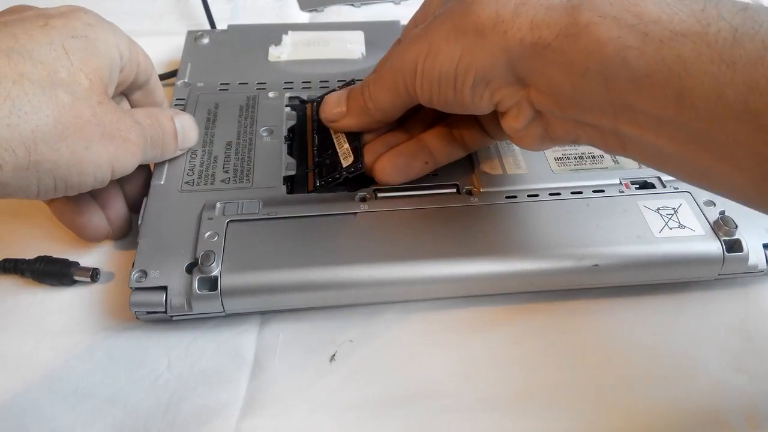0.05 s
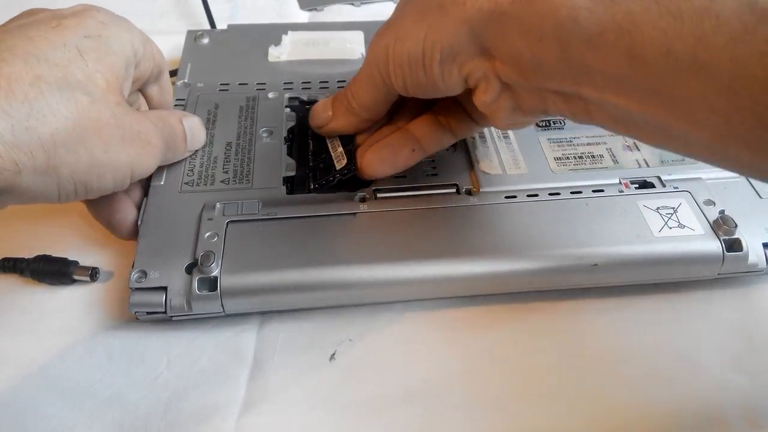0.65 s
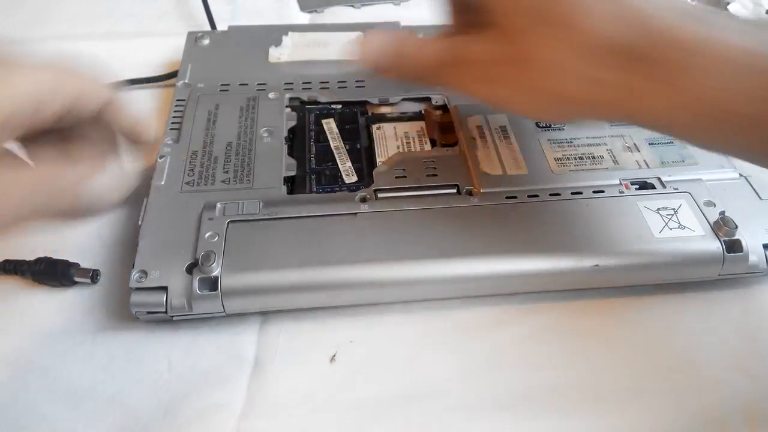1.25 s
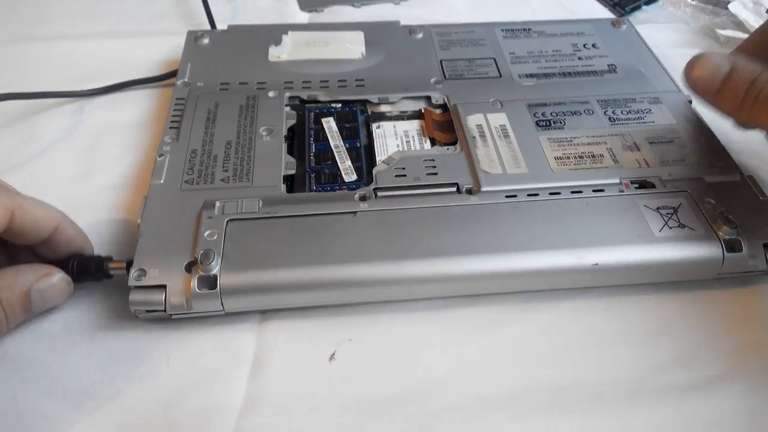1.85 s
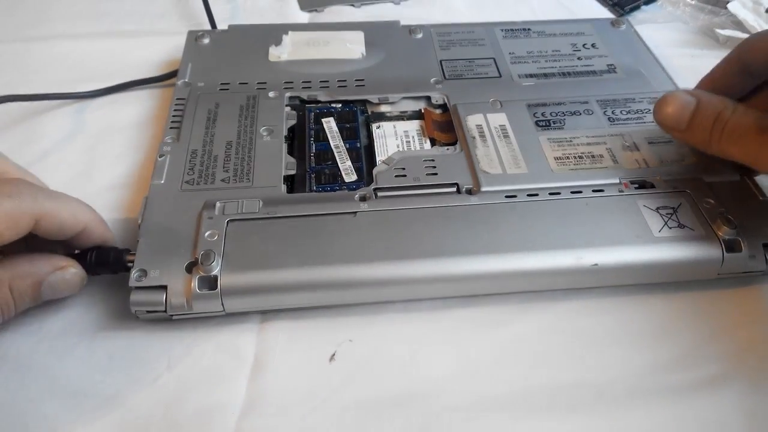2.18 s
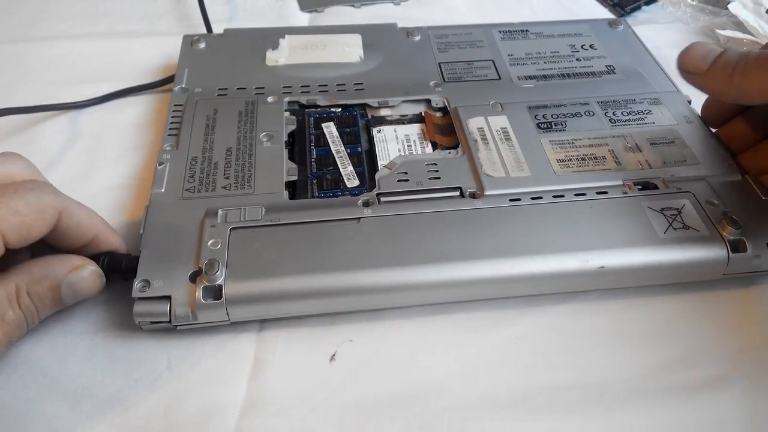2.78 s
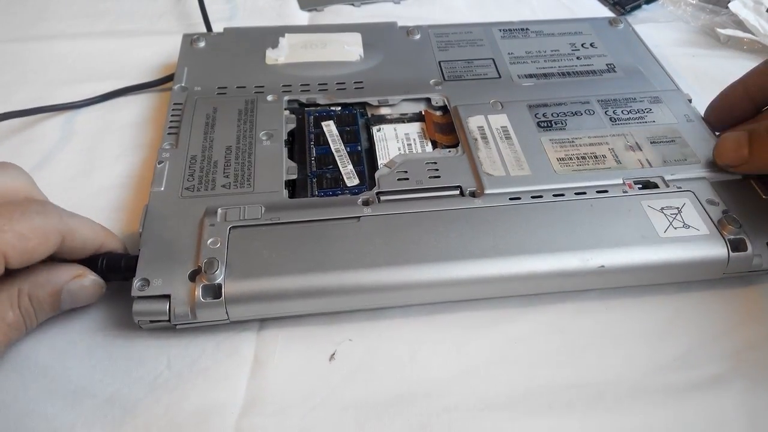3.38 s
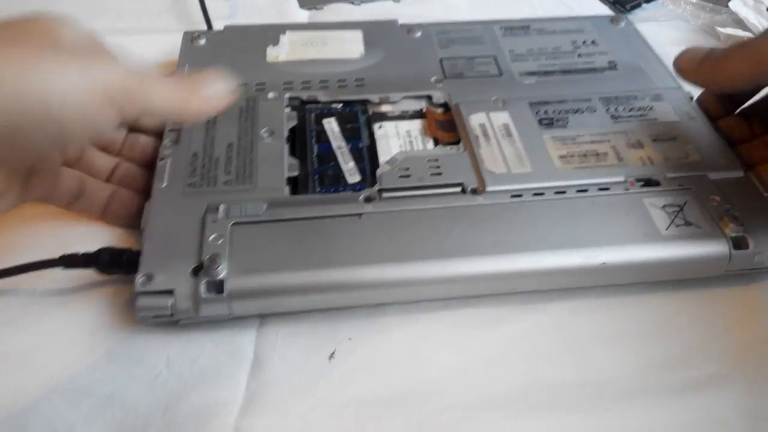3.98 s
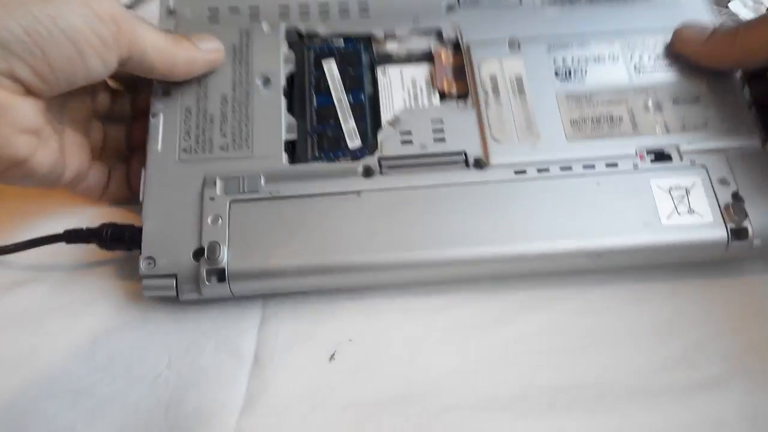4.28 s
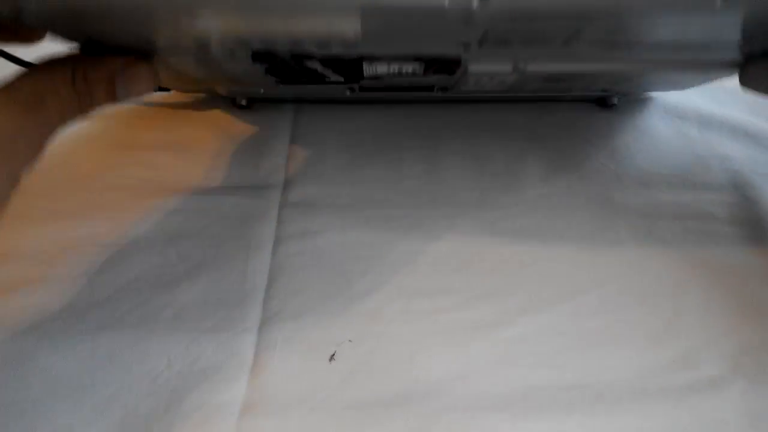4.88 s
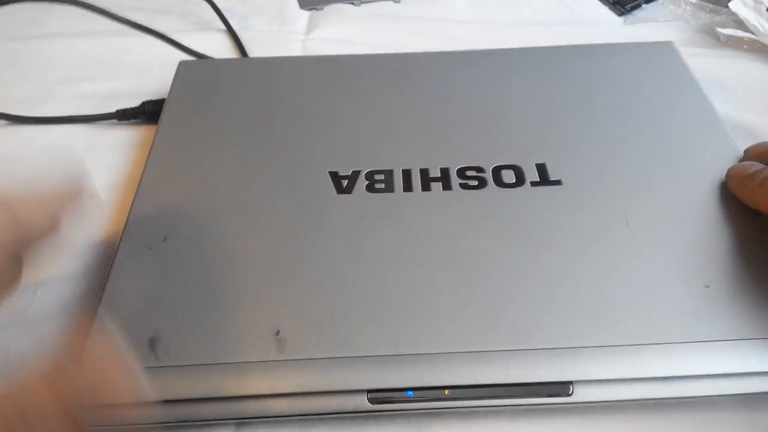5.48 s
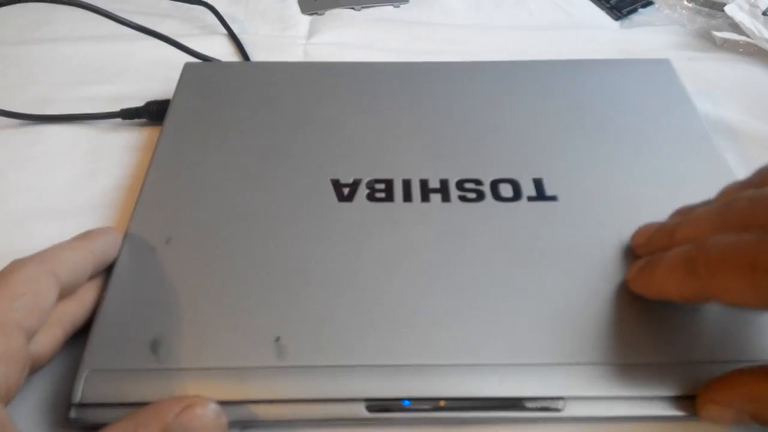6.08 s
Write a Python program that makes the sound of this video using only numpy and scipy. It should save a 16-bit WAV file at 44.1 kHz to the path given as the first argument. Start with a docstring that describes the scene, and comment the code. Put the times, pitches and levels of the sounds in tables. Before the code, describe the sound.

Close to the microphone in a small room, a plastic click and a crisp metallic snap sound as a memory module locks into a laptop. After a soft thump, a power plug clicks into place. Hands then lift and flip the laptop with quiet rubbing and sharp plastic cracks, and it lands with a thud on a covered table. A few clicks, knocks and a short finger rub follow. Faint hum and hiss lie underneath.

```python
"""A memory module clicks into a laptop until its steel latches snap; then the power plug goes in.
Plastic contacts ring the case and rebound; released springs ring far into the treble.
The laptop is gripped, creaks as it is turned over, thuds on a cloth-covered table and settles.
Fingers stick and slip on the lid. Heard close up in a small room, over faint rumble, hiss and hum."""
import sys
import numpy as np
from scipy import signal
from scipy.fft import rfft, irfft, next_fast_len
from scipy.io import wavfile

SR = 44100
rng = np.random.default_rng(int(sys.argv[2]) if len(sys.argv) > 2 else 0)


def wav_out(sig):
    """Save sig, one row per channel (or a flat mono array), as 16-bit PCM at SR to the path in sys.argv[1]."""
    wavfile.write(sys.argv[1], SR, np.round(np.clip(np.atleast_2d(sig).T, -1, 1) * 32767).astype(np.int16))


N = 275272
TIME_S = np.arange(N) / SR
RING_S = np.arange(SR // 7) / SR

# Plastic contacts. Each row: start in seconds, level in dB, ring pitch in Hz, hollow low end in dB,
# relative after-ring in dB, rightward lean from 0 to 1, settling time in seconds.
PLASTIC_CLICKS = [(0.0746, -51, 1660, 20, 3, 1, .002), (.962, -54, 2850, 26, 19, 0.6, .008),
                  (1.066, -23, 2420, 8, -5.5, 0.62, 0.0057), (1.115, -47, 2270, 21, 12, .5, 0.0019),
                  (1.5725, -55, 3770, -2.5, -5, .1, 0.0021), (2.233, -38.5, 3600, 2, -21, 0.8, 0.00071),
                  (2.689, -50, 2350, -19, 5, .5, 0.003), (2.7586, -24.5, 3650, -3, -11.5, 0.64, .0015),
                  (2.762, -32.5, 1130, 5.5, -2, .5, 0.0026), (4.123, -46.5, 2980, 25.5, -24, 0.3, 0.013),
                  (4.1997, -42.5, 3080, 19, 4, 0.6, .03), (4.236, -32.5, 2070, 9, -5, 0.45, 0.0023),
                  (4.361, -33, 2180, 8.5, -16.5, 0.2, 0.0028), (4.3768, -9, 3060, -4.5, -5.5, 0.6, .0014),
                  (4.4959, -14.5, 3250, 13, 1, 0.4, 0.0022), (4.661, -37, 2220, 8, -28, .3, 0.0021),
                  (4.803, -38, 3540, 8.5, 0.5, .3, .012), (4.9814, -20, 3150, 23, 13, .5, .012),
                  (5.1682, -42.5, 2100, -12, -1, 0.34, .002), (5.3557, -32, 3030, 23.5, 3, 0.53, 0.0044),
                  (5.378, -41, 970, 32, 25.5, 0.03, .003), (5.4992, -13.5, 3580, 4.5, -6.5, 0.6, 0.00084),
                  (5.574, -33, 1930, 24.5, 2, .1, 0.0026), (5.7019, -49, 3500, 8, -15, 0, .002),
                  (5.8416, -22, 3300, 20.5, 7, .1, .006)]
# Sprung steel. Each row: start in seconds, level in dB.
STEEL_SNAPS = [(1.132, -31), (1.1369, -12), (1.1359, -13), (1.203, -43), (1.777, -51), (4.8962, -48.5)]
# Blows on chassis and table. Each row: start in seconds, relative force in dB, contact softness in ms,
# ring time factor.
BLOWS = [(0.964, -20.5, 3.3, 1.7), (1.066, -14, 2.04, 1.4), (1.136, -14, 1.18, 0.89),
         (1.564, -19, 2.06, 0.9), (1.86, 1, 8.7, 0.66), (4.01, -18, 2.3, 1.9), (4.208, -19.5, 2.6, 2.9),
         (4.9742, -0.5, 0.62, 1.1), (4.9791, 5, 0.23, 1.09), (5.003, -5, 1.7, 0.46),
         (5.377, -22, 0.52, 1.9), (5.555, -11, 1.43, 1.1), (5.826, -12.5, 1.84, 0.71),
         (5.844, -8, 0.8, 1.65), (6.155, -22.5, 2, 1.9), (6.213, -7.5, 2.55, 1.3)]
# Hands shifting on the case. Each row: start in seconds, hold in seconds, rubbing in dB, sway in dB.
HAND_STROKES = [(0.938, 0.055, -72, -59.5), (1.694, 0.63, -96, -71), (4.085, 0.51, -66, -54),
                (5.16, 0.033, -58, -61), (5.55, 0.12, -61.5, -48.5)]
# Envelope of fingertips on the lid. Each row: time in seconds, level in dB.
LID_DRAG = [(6.09, -88), (6.12, -45.5), (6.16, -37.5), (6.18, -38.5), (6.24, -37)]

# Case and latch resonances. Each row: frequency in Hz, relative level in dB, t60 in seconds.
CASE_RESONANCES = [(513, 4, 0.087), (960, -2, .18), (1130, 0.5, 0.17), (1633, 3.5, 0.12),
                   (1960, -14, 0.033), (2210, -11.5, 0.018), (2300, 10, 0.063), (2860, -64.5, 0.031),
                   (2940, -10.5, 0.081), (3340, -8.5, 0.057), (3950, 6, 0.045), (4400, -22, 0.051),
                   (5200, -4.5, .05)]
LATCH_RESONANCES = [(2640, 24, 0.1), (3500, -8.5, .09), (5200, -22, .045), (5200, -27, 0.1),
                    (6170, -8, .04), (9400, 11.5, 0.021), (11450, -7, 0.059), (11100, -6, .05),
                    (14100, 5, .05), (15200, -1, .04)]
# Table resonances. Each row: frequency in Hz, relative level in dB, t60 in seconds before damping.
TABLE_RESONANCES = [(50.6, -14, 0.067), (98.3, -38.5, 0.39), (123, -15, 0.62), (149, -14, .14),
                    (185.3, -9.5, 0.18), (229.2, -11, .2), (263, -2, 0.026), (254, -16, 0.15),
                    (322, -13.5, 0.42), (361, -14, 0.2), (413, -29, 0.053), (483, -45, 0.11),
                    (553, -29.5, 0.47), (633, -41, 0.35)]

# Spectra of case, latch, skin rub, lid rub and room noise. Each row: frequency in Hz, gain in dB.
CASE_SPECTRUM = [(120, -31), (400, -7), (750, -13), (1400, -6.5), (2000, 2.5), (3300, 0.5), (4500, 1),
                 (6000, -9.5), (7800, -23), (10000, -12.5), (12000, -13), (15500, -19)]
LATCH_SPECTRUM = [(150, -66.5), (500, -5), (750, -12.5), (1500, -10.5), (2800, -4), (4700, -2.5),
                  (6300, -8), (7800, -22.5), (9700, -4.5), (12000, -9), (15500, -2.5)]
SKIN_SPECTRUM = [(40, -32.5), (130, 3), (300, -17.5), (700, -7.5), (1300, -4), (2100, -3.5), (3600, -0.5),
                 (5000, -6.5), (7500, -22), (11500, -10.5), (15500, -14.5)]
LID_SPECTRUM = [(40, -19), (120, 20.5), (230, -4), (350, 2), (900, -5), (1550, 1), (2400, -5), (2900, -2),
                (3400, 9), (4000, -5), (5000, -15.5), (7500, -32.5), (12000, -25.5), (15500, -26)]
AIR_SPECTRUM = [(25, -14.5), (45, -10), (70, -0.5), (110, 2), (200, -9), (370, -12), (630, -20.5),
                (1300, -26.5), (2400, -25), (4400, -24), (7600, -32.5), (9500, -31.5), (11500, -24.5),
                (15500, -27.5)]
# Spectra of chassis sway and loose parts. Each row: frequency in Hz, gain in dB.
SWAY_SPECTRUM = [(30, -32.5), (60, -2.5), (135, -7), (300, -16), (700, -31), (2000, -65)]
RATTLE_SPECTRUM = [(30, -44), (55, -11.5), (130, -11), (350, -4), (600, -8.5), (1500, -42)]
# Stereo width of handling and room noise. Each row: frequency in Hz, side gain in dB.
HANDLING_SIDE = [(60, -19.5), (250, -21.5), (500, -11.5), (1200, -7.5), (2300, -8.5), (4000, -1),
                 (7000, 4.5), (15000, 4.5)]
AIR_SIDE = [(60, -12), (200, -9.5), (700, -4.5), (2400, -3), (4400, 2.5), (8000, 7), (15000, 5)]


def undb(db):
    """Decibels to gain."""
    return 10 ** (np.asarray(db) / 20)


def unit(x):
    """Scale to rms 1."""
    return x / np.sqrt(np.mean(x ** 2))


def fade(t_s, t60_s):
    """Exponential decay, 60 dB down at t60_s."""
    return np.exp(-np.log(1000) * t_s / t60_s)


def add(track, start_s, sound):
    """Mix a sound into a track."""
    i = int(start_s * SR)
    track[..., i:i + sound.shape[-1]] += sound[..., :N - i]


def curve(points):
    """(Hz, dB) points as a function of frequency."""
    hz, db = np.transpose(points)
    return lambda f_hz: np.interp(np.log(f_hz + 1), np.log(hz), db)


def colour(x, db_at, causal=True):
    """Filter by a dB curve; minimum phase when causal, else zero phase."""
    size = 2 * next_fast_len(x.shape[-1] // 2 + 2048)
    gain = undb(db_at(np.arange(size // 2 + 1) * SR / size))
    if causal:
        cepstrum = irfft(np.log(gain))
        cepstrum[1:size // 2] *= 2
        cepstrum[size // 2 + 1:] = 0
        gain = np.exp(rfft(cepstrum))
    return irfft(rfft(x, size) * gain, size)[..., :x.shape[-1]]


def noise(spectrum):
    """Two independent coloured noises."""
    return colour(rng.standard_normal((2, N)), curve(spectrum))


def place(pair, right):
    """Two unrelated signals to mid and side; leaning ties the side to the mid."""
    right = np.clip(right, -.98, .98)
    return np.array([pair[0], np.sqrt(1 - right ** 2) * pair[1] - right * pair[0]])


def background(air_db=-58.6, hum_db=-62, hum_hz=70.3, waver_hz=.6):
    """Steady room rumble and hiss with a wavering hum."""
    air = noise(AIR_SPECTRUM)
    mid, side = air * undb(air_db) / air[0].std()
    waver = np.interp(TIME_S, np.linspace(0, TIME_S[-1], 24), rng.standard_normal(24))
    hum = np.sqrt(2) * np.sin(2 * np.pi * np.cumsum(hum_hz + waver_hz * waver) / SR)
    return np.array([mid + undb(hum_db) * hum, colour(side, curve(AIR_SIDE), causal=False)])


def room(dry, wet_db=-19.5, low_db=5.5, low_t60_s=.29, middle_t60_s=.25, top_t60_s=.19):
    """Small-room reflections: lows linger, cloth absorbs the treble."""
    t_s = np.arange(SR // 3) / SR
    onset = np.clip((t_s - .004) / .0089, 0, 1)
    diffuse = rng.standard_normal((2, len(t_s))) * onset
    low, middle, top = (signal.sosfilt(signal.butter(2, hz, kind, fs=SR, output="sos"), diffuse)
                        for hz, kind in [(500, "low"), ((500, 6000), "band"), (6000, "high")])
    tail = undb(low_db) * low * fade(t_s, low_t60_s)
    tail += middle * fade(t_s, middle_t60_s) + top * fade(t_s, top_t60_s)
    tail *= undb(wet_db) / np.sqrt(np.sum(tail[0] ** 2))
    return signal.fftconvolve(dry[:1], tail, axes=1)[:, :N]


def grip(attack_s=.11, release_s=.35, resting_db=-75):
    """Rub and sway gains: each hand stroke swells, holds and dies away."""
    gains = np.full((2, N), undb(resting_db))
    for start_s, hold_s, *levels_db in HAND_STROKES:
        corners_s = [start_s - attack_s, start_s, start_s + hold_s, start_s + hold_s + release_s]
        gains += undb(levels_db)[:, None] * np.interp(TIME_S, corners_s, [0, 1, 1, 0])
    return gains


def sway(gain):
    """Moving hands make the chassis rumble."""
    return gain * unit(noise(SWAY_SPECTRUM))


def friction(gain, spectrum, right, slips_per_s=6000):
    """Skin sticks and slips: dense, uneven micro-clicks into the panel."""
    slips = rng.random((2, N)) < slips_per_s / SR
    sizes = rng.standard_normal((2, N))
    return gain * place(unit(colour(slips * sizes, curve(spectrum))), right)


def strike(modes, db_at, crack_t60_s, shell_t60_s, shell_db, modes_db):
    """Sharp crack, dense shell ring and sparse modes; rms 1 over the first 2 ms."""
    hz, db, t60_s = np.transpose(modes)[:, :, None]
    envelope = fade(RING_S, crack_t60_s) + undb(shell_db) * fade(RING_S, shell_t60_s)
    dense = rng.standard_normal((2, len(RING_S))) * envelope
    detuned_hz = hz * (1 + .0017 * rng.standard_normal(hz.shape))
    feed = np.exp(2j * np.pi * rng.random((2, len(modes))))  # contact point sets the phases
    rings = undb(db) * fade(RING_S, t60_s) * np.exp(2j * np.pi * detuned_hz * RING_S)
    pair = colour(dense + undb(modes_db) * (feed @ rings).imag, db_at)
    return pair / np.sqrt(np.mean(pair[:, :SR // 500] ** 2, axis=1, keepdims=True))


def contact(hz, low_db, ring_db, focus_db=10, focus_octaves=.49, low_hz=1400, top_hz=6500):
    """A contact rings the case, boosted near the pitch of the touched part."""
    # Small parts and broad, hollow contacts are brighter.
    top_db = -3.5 + 10 * np.log2(hz / 3100) + .53 * low_db

    def tone_db(f_hz):
        peak_db = focus_db * np.exp(-(np.log2((f_hz + 1) / hz) / focus_octaves) ** 2)
        low_shelf_db = low_db / (1 + (f_hz / low_hz) ** 4)
        top_shelf_db = top_db * (1 - 1 / (1 + (f_hz / top_hz) ** 4))
        return curve(CASE_SPECTRUM)(f_hz) + peak_db + low_shelf_db + top_shelf_db

    return strike(CASE_RESONANCES, tone_db, crack_t60_s=.009, shell_t60_s=.12,
                  shell_db=ring_db - 17, modes_db=ring_db - 36)


def creaks(ticks_per_s=9, level_db=-56, spread_db=3, centre_hz=3400, spread_octaves=.26):
    """Seams tick at random moments of the hand strokes."""
    out = np.zeros((2, N))
    chance = rng.random((len(HAND_STROKES), 40, 3))
    for (start_s, hold_s, *_), draws in zip(HAND_STROKES, chance):
        for slot, (jitter, size, pitch) in enumerate(draws):
            delay_s = (slot + jitter) / ticks_per_s
            if delay_s < hold_s:
                tick = contact(centre_hz * 2 ** (spread_octaves * (2 * pitch - 1)), low_db=6, ring_db=3)
                gain = undb(level_db + spread_db * (2 * size - 1))
                add(out, start_s + delay_s, gain * place(tick, right=.27))
    return out


def recoils(offset_db=-10, soft_ms=1.06):
    """Plastic contacts push the chassis, hollow ones harder; rows as in BLOWS."""
    return [(start_s, db + low_db + offset_db, soft_ms, 1)
            for start_s, db, _, low_db, *_ in PLASTIC_CLICKS]


def thuds(gain_db=-5, rattle_db=-22, rattle_base_t60_s=.25, detune=.0062, damping=1.76):
    """Pushes ring chassis and table, softer ones duller; hands damp and detune the modes."""
    t_s = np.arange(SR // 4) / SR
    hz, db, t60_s = np.transpose(TABLE_RESONANCES)[:, :, None]
    loose_parts = unit(noise(RATTLE_SPECTRUM))
    out = np.zeros((2, N))
    for start_s, force_db, soft_ms, ring_scale in list(BLOWS) + recoils():
        push = t_s * np.exp(-1000 * t_s / soft_ms)
        detuned_hz = hz * (1 + detune * rng.standard_normal(hz.shape))
        rings = undb(db) * np.sin(2 * np.pi * detuned_hz * t_s) * fade(t_s, ring_scale * t60_s / damping)
        feed = undb(2 * rng.standard_normal((2, len(hz))))
        feed[1] *= rng.choice([-1, 1], len(hz))  # each mode radiates more to one side
        i = rng.integers(N - len(t_s))
        rattle = loose_parts[:, i:i + len(t_s)] * fade(t_s, ring_scale * rattle_base_t60_s)
        body = feed @ rings + undb(rattle_db) * rattle
        thud = signal.fftconvolve(body, [push / push.sum()], axes=1)[:, :len(t_s)]
        add(out, start_s, -undb(force_db + gain_db) * thud)
    # A small table barely radiates below its lowest mode.
    return signal.sosfilt(signal.butter(8, 51, "high", fs=SR, output="sos"), out)


def latches():
    """Steel springs let go and ring far into the treble."""
    out = np.zeros((2, N))
    for start_s, db in STEEL_SNAPS:
        snap = strike(LATCH_RESONANCES, curve(LATCH_SPECTRUM), crack_t60_s=.012, shell_t60_s=.11,
                      shell_db=-20, modes_db=-50)
        add(out, start_s, undb(db) * place(snap, right=.65))
    return out


def plastic_clicks(give_s=.0058, give_db=-13, loose_s=.0045, rebound_db=-8, gap_ratio=.6):
    """Parts click home and rebound twice, sooner and weaker; loose ones give a little first."""
    out = np.zeros((2, N))
    order = np.arange(2)
    gaps = gap_ratio ** order
    for start_s, db, hz, low_db, ring_db, right, settle_s in PLASTIC_CLICKS:
        looseness = np.clip(settle_s / loose_s, 0, 1) ** 3
        rebounds = zip(settle_s * np.cumsum(gaps) / gaps.sum(), undb(rebound_db * (order + 1)))
        for delay_s, gain in [(-give_s, looseness * undb(give_db)), (0, 1), *rebounds]:
            if gain > .03:
                click = place(contact(hz, low_db, ring_db), right)
                add(out, start_s + delay_s, undb(db) * gain * click)
    return out


def scene():
    """Mix handling and room as mid and side; return left and right."""
    rub_gain, sway_gain = grip()
    drag_gain = undb(np.interp(TIME_S, *np.transpose(LID_DRAG), left=-np.inf))
    handling = plastic_clicks() + latches() + thuds() + sway(sway_gain)
    handling += friction(rub_gain, SKIN_SPECTRUM, right=.3)
    handling += friction(drag_gain, LID_SPECTRUM, right=-.27)
    floor = background()
    handling += creaks()
    mid, side = handling + room(handling)
    side = colour(side, curve(HANDLING_SIDE), causal=False)
    mid, side = np.array([mid, side]) + floor
    return np.array([mid + side, mid - side])


def record(dry):
    """Clip at full scale, then low-pass at 15.8 kHz."""
    return signal.sosfilt(signal.ellip(8, .2, 70, 15800, fs=SR, output="sos"), np.clip(dry, -1, 1))


dry = scene()
out = record(dry)
wav_out(out)
```